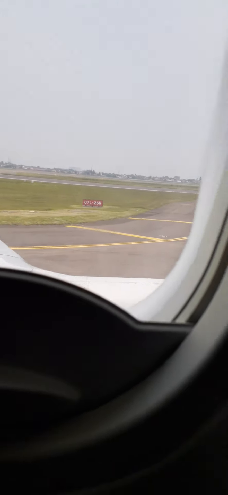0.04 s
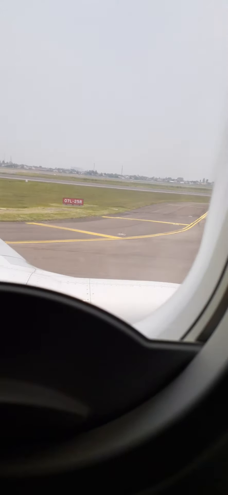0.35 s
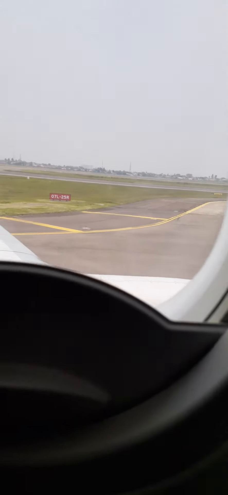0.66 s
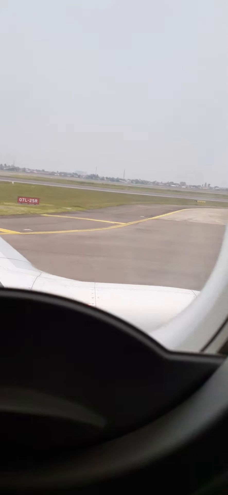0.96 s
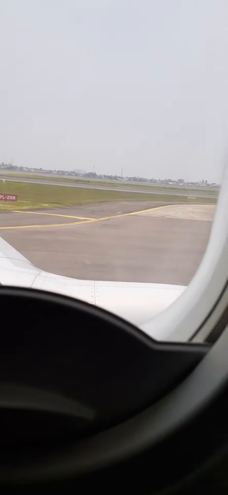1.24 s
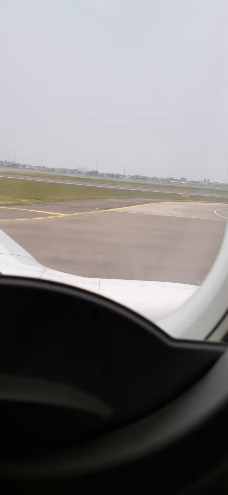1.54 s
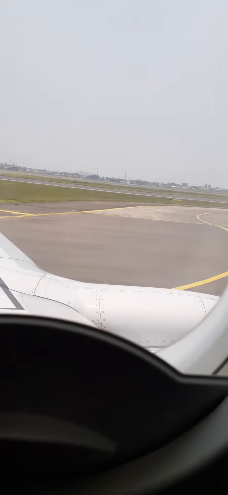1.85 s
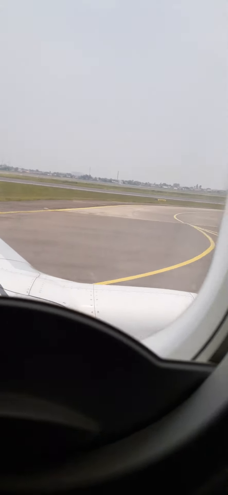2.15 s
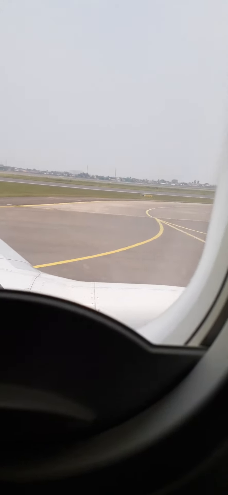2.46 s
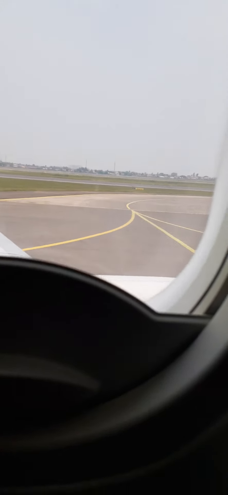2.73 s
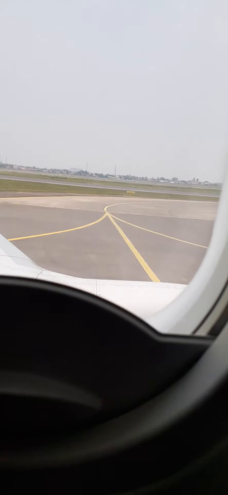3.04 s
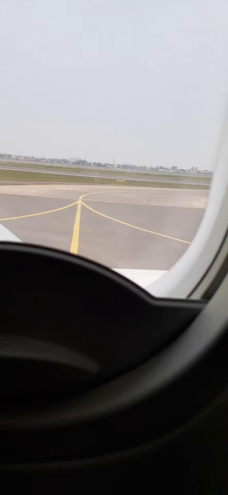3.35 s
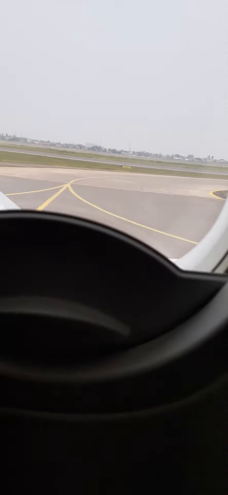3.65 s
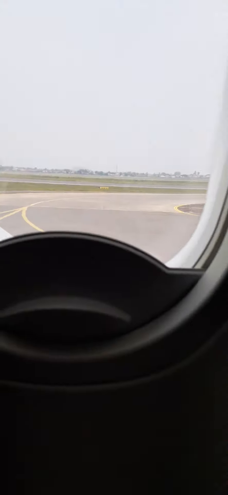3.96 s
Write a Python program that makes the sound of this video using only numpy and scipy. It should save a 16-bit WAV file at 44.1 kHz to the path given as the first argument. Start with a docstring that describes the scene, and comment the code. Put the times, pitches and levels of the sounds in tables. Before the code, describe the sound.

A low engine hum and rolling rumble fill the cabin of a taxiing airliner, heard from a window seat. A thin turbine whine flutters above soft ventilation air, with a few soft wheel thuds and faint trim ticks.

```python
"""A low engine hum over rolling rumble and ventilation air, inside an airliner taxiing through a turn.
The stereo microphone is at a window seat by the wing. From outside, through the fuselage, come the
tones of the engine shafts and the fluttering whine of the turbine blades. Below the floor the wheels
thud softly over pavement joints; nearby the cabin trim gives a few faint ticks and one tiny squeak."""
import sys
import numpy as np
from scipy import signal
from scipy.fft import rfft, irfft
from scipy.io import wavfile
from scipy.ndimage import uniform_filter1d

SR = 44100
rng = np.random.default_rng(int(sys.argv[2]) if len(sys.argv) > 2 else 0)


def wav_out(sig):
    """Save sig, one row per channel (or a flat mono array), as 16-bit PCM at SR to the path in sys.argv[1]."""
    wavfile.write(sys.argv[1], SR, np.round(np.clip(np.atleast_2d(sig).T, -1, 1) * 32767).astype(np.int16))


N = 176400
TIME, FREQ = np.arange(N) / SR, np.fft.rfftfreq(N, 1 / SR)


def engine_hum():
    """The low drone of the engine, carried through the fuselage to the seat."""
    # pitch of the drone: t/s, f/Hz
    pitch = [(0, 149.6), (.4, 148.7), (1.0, 149.3), (2.0, 149.5), (4, 149.6)]
    # its level: t/s, level/dB
    level = [(0, -22), (.14, -18), (.22, -33.5), (.33, -16), (.52, -23), (.6, -26), (.72, -23),
             (1.08, -22.5), (1.18, -26), (1.27, -23), (1.88, -22), (2.02, -21), (2.6, -21.5), (3.3, -22),
             (3.65, -19), (4, -23.5)]
    return pan(-2) * amp(curve(level)) * stereo_sine(curve(pitch), lead=-.2)


def rumble_and_air():
    """Rolling rumble and ventilation hiss all around the microphone, wavering slightly."""
    # noise spectrum in the cabin: f/Hz, density/(dB per Hz)
    density = [(15, -77.5), (27, -71.5), (38, -63.5), (52, -50), (70, -48), (95, -42.5), (115, -46.5),
               (135, -43.5), (190, -47), (240, -57.5), (300, -58), (365, -55.5), (450, -63.5), (540, -69.5),
               (780, -70), (950, -67.5), (1250, -76.5), (1650, -77), (1950, -78), (2400, -81.5),
               (2800, -84), (3300, -86.5), (4100, -91), (5200, -95.5), (6500, -99.2), (8400, -98.5),
               (10200, -102.3), (12700, -101.9), (14400, -110.1), (15500, -118.5)]
    # its stereo image: f/Hz, left minus right/dB, left-right correlation
    image = [(40, -4, 1), (150, -1.2, 0.9), (250, -5, 0.82), (350, -1.5, 0.42), (500, 0.1, 0.47),
             (650, -4, -0.13), (990, -1, -0.28), (1400, -0.5, -0.52), (2000, -1, 0.21), (2800, -4.5, 0.064),
             (4000, -1, -0.16), (6000, -1, -0.16), (10000, -5, -0.02), (14000, -2.3, -0.36)]
    # low-mid roar, easing as the aircraft turns: t/s, gain/dB
    roar_gain = [(0, 1.5), (.8, 0.5), (1.7, 1), (2.3, -1.5), (3.2, -.5), (4, -1)]
    shape = amp(spectrum(density, FREQ)) * np.sqrt(SR / 2) * pan(spectrum(image, FREQ))
    air = irfft(noise_pair(spectrum(image, FREQ, axis=2)) * shape, N)
    roar = irfft(rfft(air) * band(centre_hz=360, octaves=.45), N)
    air = air + (amp(curve(roar_gain)) - 1) * roar
    # random patches of frequency and time grow a little louder or softer
    patch_db, swell_db = .6, .43
    frames = signal.stft(air, nperseg=1024)[2]
    patches = uniform_filter1d(rng.standard_normal(frames.shape[1:]), size=14, axis=0)
    patches = uniform_filter1d(patches, size=8, axis=1)
    air = signal.istft(frames * amp(patch_db * patches / patches.std()))[1][:, :N]
    return air * amp(swell_db * wander(rate_hz=2))


def turbine_blades():
    """Outside the window: a fluttering blade tone, its octave and narrow bands of blade noise."""
    # strongest blade tone: t/s, level/dB
    blade_level = [(0, -49.5), (.33, -35), (.5, -42.5), (.65, -35), (.9, -46), (1.1, -39), (1.39, -36.5),
                   (1.6, -49), (1.78, -37), (2.03, -37), (2.22, -46), (2.4, -38.5), (2.9, -45.5),
                   (3.25, -50), (3.42, -36), (3.62, -47), (3.8, -34.5), (4, -36.5)]
    # its octave: t/s, level/dB
    octave_level = [(0, -54.5), (.5, -55), (.7, -48), (.85, -61), (1.1, -54.5), (1.25, -52.5),
                    (1.35, -63.5), (1.47, -49), (1.62, -60.5), (1.8, -49), (2.0, -50.5), (2.15, -60.5),
                    (2.35, -54), (3, -56.5), (4, -57.5)]
    # blade noise: f/Hz, width/Hz, left/dB, right/dB, left-right correlation
    whines = [(882, 23, -61.5, -54.5, 0), (1474, 2.2, -50.5, -49, -.6), (1486, 45, -47.5, -46, -0.45),
              (2970, 60, -53.5, -55, 0.13), (4407, 110, -63.5, -56, 0.077), (5920, 90, -70, -69.5, 0),
              (7430, 110, -80, -81.5, -0.054), (8310, 40, -80, -77, 0)]
    blade_hz = 1488.3
    blade = pan(-4.5) * amp(curve(blade_level)) * tone(blade_hz, lead=2.43, flutter=.36, flutter_hz=12.2)
    octave = amp(curve(octave_level)) * whistle(2 * blade_hz, jitter_hz=6.9, pan_db=.5, lead=-.12)
    return blade + octave + sum(whine(*row) for row in whines)


def whine(hz, width_hz, left_db, right_db, correlation):
    """A blade tone smeared into a narrow band by turbulence."""
    shape = 1 / (1 + ((FREQ - hz) / (.5 * width_hz)) ** 2 / 2)
    return amp([[left_db], [right_db]]) * unit(irfft(noise_pair(correlation) * shape, N))


def machinery():
    """Thin tones of engine and pumps, with a core shaft and a gear that swell as the aircraft turns."""
    # steady engine and cabin pump tones: f/Hz
    steady_hz = [247.5, 298.5, 496, 1364, 1736, 1765, 2615, 3528]
    # the same tones at the microphone: left/dB, right/dB, left lead/rad
    steady_tones = [(-45.5, -42.5, -0.05), (-41.5, -58.5, -1.5), (-57, -50, 0), (-61.5, -59, -2),
                    (-57.5, -63, .8), (-63, -60, -1), (-65, -70.5, 1.5), (-68.5, -70.5, 3.5)]
    # core shaft harmonics, from the second up: left/dB, right/dB, left lead/rad
    harmonics = [(-60.5, -54, 3.5), (-50.5, -49, 2.5), (-52, -54, 2.5), (-50, -53.5, 2), (-65.5, -65, -2.1),
                 (-67.5, -70, -0.9), (-76.5, -63.5, -1)]
    # core shaft fundamental: t/s, left/dB, right/dB
    shaft_level = [(0, -48, -51.5), (1.4, -41.5, -46), (2.1, -46, -47), (2.6, -53, -36), (3.1, -54, -41.5),
                   (3.5, -39, -33), (4, -48, -40.5)]
    # gear tone: t/s, left/dB, right/dB
    gear_level = [(0, -62.5, -63), (2, -58.5, -60.5), (3.5, -70, -65), (3.85, -63, -48.5), (4, -54, -51)]
    shaft_hz, gear_hz = 345.2, 2646.5
    pitches = steady_hz + [shaft_hz * k for k in range(2, 2 + len(harmonics))]
    out = 0
    for hz, (left, right, lead) in zip(pitches, steady_tones + harmonics):
        out += amp([[left], [right]]) * tone(hz, lead, flutter=.32)
    for hz, level, lead in (shaft_hz, shaft_level, .5), (gear_hz, gear_level, -1):
        out += amp([curve(level), curve(level, axis=2)]) * tone(hz, lead, flutter=.17)
    return out


def compressor():
    """Three high whistles of the engine's compressor, well to the right of the microphone."""
    # main whistle: t/s, level/dB
    main_level = [(0, -49.5), (.7, -55), (1.4, -53), (1.9, -60), (2.15, -52), (3.5, -50.5), (3.95, -59.5)]
    # thin top whistle: t/s, level/dB
    thin_level = [(0, -77), (.4, -76), (1.0, -80), (1.9, -79), (2.1, -69), (2.4, -77), (3.0, -75.5),
                  (3.3, -76), (4, -74)]
    main = amp(curve(main_level)) * whistle(hz=4466, jitter_hz=23, pan_db=-13.5, lead=1.5)
    upper = amp(-62.5) * whistle(hz=4660, jitter_hz=8.2, pan_db=-13.5, lead=1.5)
    thin = amp(curve(thin_level)) * whistle(hz=11840, jitter_hz=45, pan_db=-12.5, lead=1.5)
    return main + upper + thin


def wheel_thuds():
    """Each pavement joint, cushioned by the landing gear, rocks the airframe for a few low cycles."""
    # thuds under the floor, at their peaks: t/s, level/dB
    joints = [(.81, -30), (2.24, -30.5), (3.22, -27), (3.9, -31)]
    airframe_hz = 54.1
    out = 0
    for peak_s, db in joints:
        rocking = unit(np.sin(2 * np.pi * (airframe_hz * TIME + rng.random())))
        out += amp(db) * swell(peak_s, width_s=.039) * rocking
    return pan(-2) * out


def trim_ticks():
    """Brief bright snaps of plastic trim near the seat, each with a short cabin tail."""
    # snaps: t/s, level/dB, decay/s, centre f/Hz, width/octaves
    ticks = [(.502, -49.5, 0.0077, 8500, .5), (1.499, -53, .006, 6500, 0.83), (1.941, -59, 0.022, 6000, .7),
             (2.611, -56, .012, 7500, .5), (2.718, -54, .008, 7500, .5), (2.721, -52, .016, 11300, .17)]
    rise_s, tail_db, tail_s = .001, -19, .03
    out = 0
    for start, db, decay_s, centre_hz, octaves in ticks:
        age = np.maximum(TIME - start, 0)
        attack = np.minimum(age / rise_s, 1)
        decay = np.exp(-age / decay_s) + amp(tail_db) * np.exp(-age / tail_s)
        snap = unit(irfft(noise_pair(0) * band(centre_hz, octaves), N))
        out += amp(db) * attack * decay * snap
    return pan(-5) * out


def trim_squeak():
    """Two trim panels rub for a moment."""
    return amp(-62) * swell(peak_s=1.455, width_s=.012) * whistle(hz=12550, jitter_hz=70)


def tone(hz, lead, flutter, flutter_hz=3.4):
    """A drifting stereo sine of rms 1 that flutters separately on each side."""
    pitch = hz * (1 + .00029 * wander(rate_hz=1.1))
    phase = 2 * np.pi * np.cumsum(pitch) / SR + rng.uniform(0, 2 * np.pi)
    return unit(np.array([np.cos(phase + p) * (1 + flutter * wander(flutter_hz)) for p in (lead, 0)]))


def whistle(hz, jitter_hz, pan_db=0, lead=0):
    """A tone of even strength whose pitch trembles quickly."""
    return pan(pan_db) * stereo_sine(hz + jitter_hz * wander(rate_hz=70), lead)


def stereo_sine(pitch_hz, lead):
    """A sine of rms 1 along a pitch curve, the left side ahead by lead radians."""
    phase = 2 * np.pi * (np.cumsum(pitch_hz) / SR + rng.random())
    return unit(np.cos(phase + np.array([[lead], [0]])))


def noise_pair(correlation):
    """Spectra of two partly alike white noises."""
    left, other = rfft(rng.standard_normal((2, N)))
    return np.array([left, correlation * left + np.sqrt(1 - correlation ** 2) * other])


def wander(rate_hz):
    """Smooth random motion of rms 1."""
    lowpass = np.exp(-.5 * (FREQ / rate_hz) ** 2) * (FREQ > 0)
    return unit(irfft(rfft(rng.standard_normal(N)) * lowpass, N))


def swell(peak_s, width_s):
    """A bell-shaped rise and fall."""
    return np.exp(-.5 * ((TIME - peak_s) / width_s) ** 2)


def band(centre_hz, octaves):
    """A bell-shaped passband over log frequency."""
    return np.exp(-.5 * (np.log2((FREQ + 1) / centre_hz) / octaves) ** 2)


def curve(rows, axis=1):
    """One column of a table, joined over time."""
    rows = np.array(rows)
    return np.interp(TIME, rows[:, 0], rows[:, axis])


def spectrum(rows, hz, axis=1):
    """One column of a table, joined over log frequency."""
    rows = np.array(rows)
    return np.interp(np.log(hz + 1), np.log(rows[:, 0] + 1), rows[:, axis])


def pan(db):
    """Left and right gains of mean power 1, the left louder by db."""
    gains = amp(np.array([[.5], [-.5]]) * db)
    return gains / np.sqrt(np.mean(gains ** 2, axis=0))


def amp(db):
    """Decibels to gain."""
    return 10 ** (np.asarray(db) / 20)


def unit(x):
    """Scales to rms 1."""
    return x / np.sqrt(np.mean(abs(x) ** 2, axis=-1, keepdims=True) + 1e-30)


def scene():
    """Everything that reaches the microphone at the window seat."""
    steady = rumble_and_air() + engine_hum() + machinery() + turbine_blades() + compressor()
    return steady + wheel_thuds() + trim_ticks() + trim_squeak()


def record(dry):
    """The recorder's band limit, with soft ends."""
    fade_s, cutoff_hz = .004, 15600
    ends = np.minimum(np.minimum(TIME, TIME[::-1]) / fade_s, 1)
    lowpass = signal.firwin(511, cutoff_hz, window=("kaiser", 9), fs=SR)
    return signal.oaconvolve(dry * np.sin(np.pi / 2 * ends) ** 2, lowpass[None], "same")


dry = scene()
out = record(dry)
wav_out(out)
```